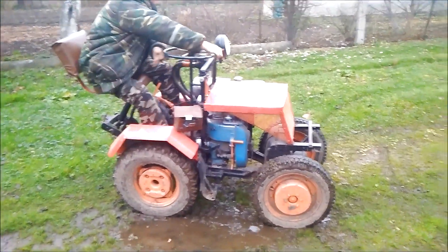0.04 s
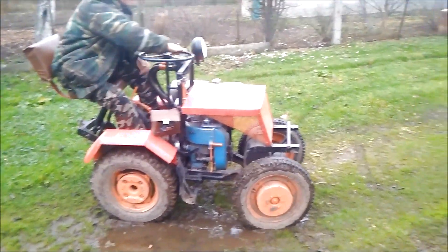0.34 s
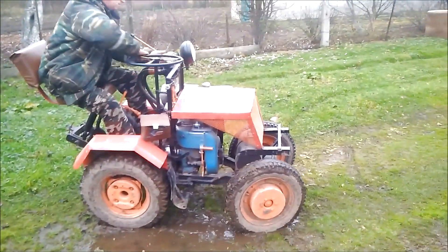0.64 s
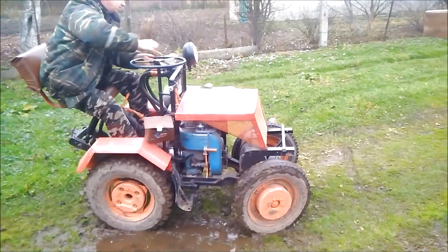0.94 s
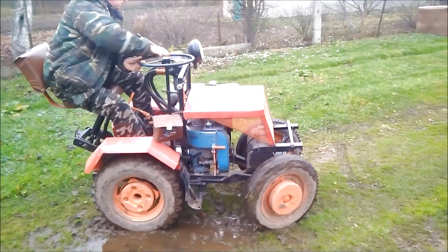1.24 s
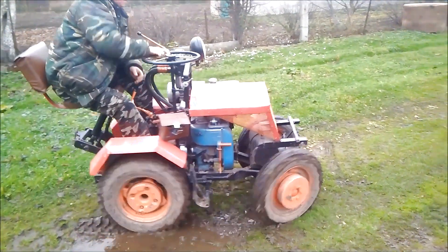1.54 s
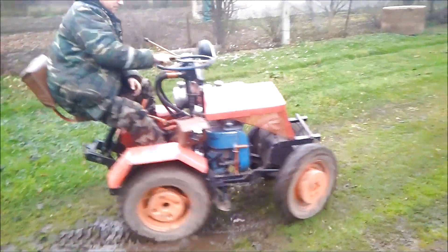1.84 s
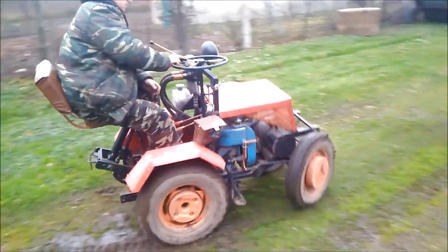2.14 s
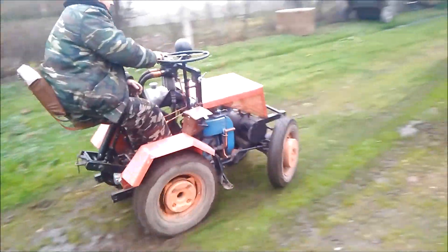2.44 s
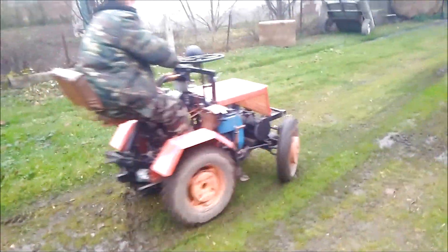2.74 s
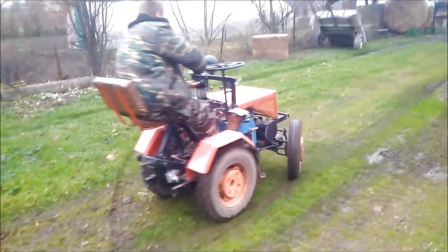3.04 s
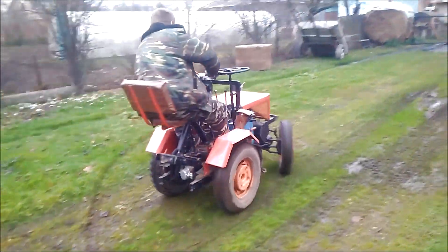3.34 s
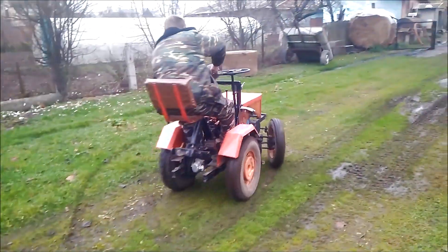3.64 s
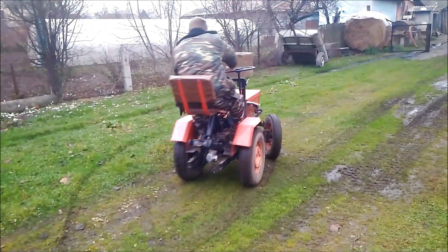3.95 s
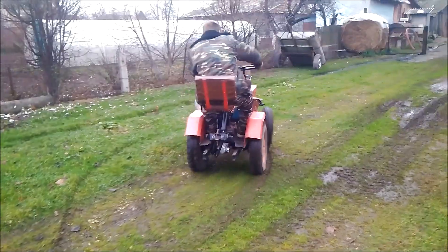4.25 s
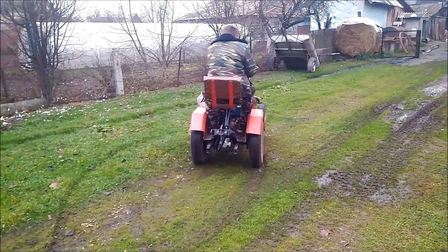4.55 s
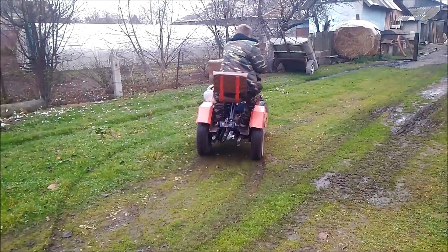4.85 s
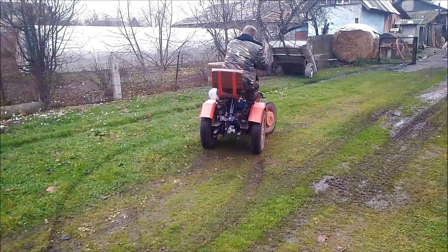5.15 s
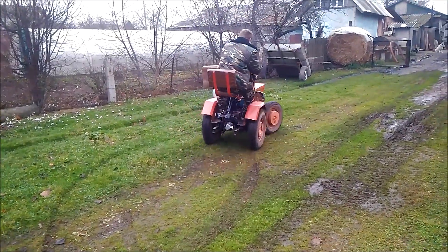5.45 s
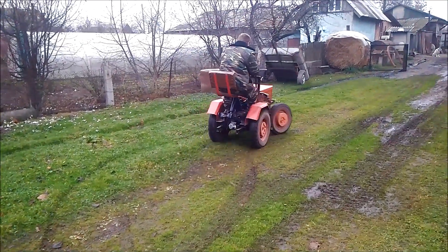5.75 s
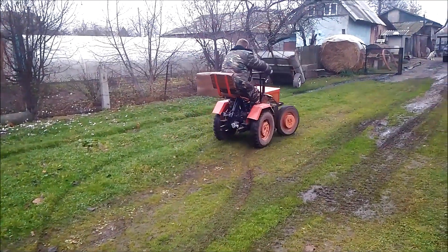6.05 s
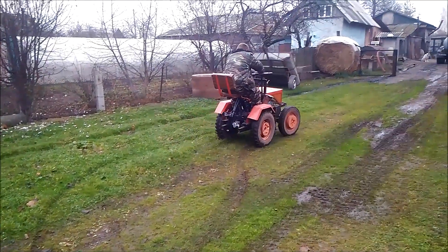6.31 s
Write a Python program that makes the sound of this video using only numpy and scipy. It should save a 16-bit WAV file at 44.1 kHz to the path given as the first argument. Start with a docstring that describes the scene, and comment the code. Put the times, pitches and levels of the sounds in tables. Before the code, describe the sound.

Rapid chugging and metallic clatter from a mini tractor, which revs, dips, knocks and pulls a short way off, sounding duller.

```python
"""A grassy yard with a fence and sheds, the microphone two to three metres from a homemade mini tractor.
Its single-cylinder four-stroke fires about 21 times a second: each firing thumps in the muffler, barks
from the pipe and shakes the casing and loose sheet metal, while tappets tick and the fan whines.
The engine revs, sags and knocks as it takes the load, picks up, and pulls away to six or seven metres,
tail towards the microphone. Behind it lie a faint echo, quiet air and a little wind on the microphone."""
import sys
import numpy as np
from scipy import signal
from scipy.fft import rfft, irfft, next_fast_len
from scipy.io import wavfile
from scipy.ndimage import uniform_filter1d, map_coordinates

SR = 44100
rng = np.random.default_rng(int(sys.argv[2]) if len(sys.argv) > 2 else 0)


def unload_wav(signal):
    """Save mono or channel-first audio to the path in sys.argv[1] as 16-bit WAV at rate SR, clipped to [-1, 1]."""
    wavfile.write(
        sys.argv[1],
        SR,
        np.round(np.clip(np.atleast_2d(signal).T, -1, 1) * 32767).astype(np.int16),
    )


N = 290178

# engine speed: time_s, firings_per_s
ENGINE_SPEED = [(0.0, 21.17), (0.36, 22.62), (0.62, 24.25), (0.91, 25.06), (1.3, 23.48), (1.64, 22.89),
                (1.93, 18.51), (2.07, 18.53), (2.37, 20.99), (2.99, 22.49), (3.42, 21.64), (4.06, 21.25),
                (4.45, 21.61), (5.1, 20.63), (5.44, 21.12), (6.17, 19.11), (6.58, 18.69)]
# how hard the cylinder fires: time_s, effort_db
ENGINE_EFFORT = [(.03, 14.5), (.12, 9.5), (.33, 0.5), (.46, 5), (.53, 3.5), (.64, 4), (1, 6.5),
                 (1.18, -1.24), (2.08, -2.5), (2.25, -0.5), (2.37, -2), (2.48, -3), (3.75, 2.5), (5.6, 2),
                 (5.96, 1), (6.12, -3.5), (6.58, -1)]
# path from the microphone: time_s, distance_m, heading (0 side, 1 rear quarter, 2 tail, 3+ far quarter)
DRIVE_PATH = [(0, 3, 0.28), (2.3, 2.03, 0.03), (2.9, 2.3, 0.34), (3.5, 3.94, 0.79), (3.8, 4.07, 0.75),
              (4.3, 4.2, 2), (5.55, 5.14, 2.17), (6.1, 6.8, 3.65), (6.58, 6, 4.1)]
# where the tractor sits in the stereo picture: time_s, left_minus_right_db
BALANCE = [(0, 4), (.3, 2), (.75, 3.4), (1.25, 4), (1.75, 7.5), (2.25, 1), (2.75, 4.5), (3.25, 3.5),
           (3.8, 5), (6.58, 5)]
# the thump thins in the free rev and swells under load: time_s, gain_db
THUMP_GAIN = [(.1, 0.5), (.33, 2.3), (.7, 1), (.9, -4.5), (1.05, -3), (1.2, 0), (1.6, 0), (1.95, -0.7),
              (2.15, -1), (2.25, 3.5), (2.36, 4), (2.46, -0.3), (3.4, -1), (5.6, -1.9), (6.1, 3), (6.55, 1)]
# bark and gas rush at the pipe: time_s, gain_db
BARK_GAIN = [(0, -5.5), (.13, -4), (.22, 0), (.35, 2.5), (.65, 5), (1.02, -1.5), (1.22, -4.5), (1.75, -13),
             (2.35, -12.5), (2.7, -9), (3.27, -3.5), (4.3, -5.5), (5.97, -2.5), (6.12, -2.5), (6.58, -9.5)]
# firings that burn harder than their neighbours: time_s, extra_bark_db
HARD_FIRINGS = [(3.26, 3.5), (3.54, 0), (3.59, 4.5), (3.72, 6), (4.1, 2), (4.47, 2.5), (5.23, 4), (5.47, 4),
                (6.48, 4)]
# pipe resonances as heard from each heading: pitch_hz, width_hz, signed_strength
SIDE_MODES = [(159, 21, 0.19), (290, 67, -0.041), (431, 167, 0.77), (453.5, 58, -1.01), (600, 123, -0.16)]
QUARTER_MODES = [(195, 74, -0.67), (364, 90, 0.27), (498, 36, 0.2), (605, 44, 0.42), (686, 25, -0.22),
                 (927, 37, 0.08), (1100, 100, 0.01), (1350, 110, -0.06), (1550, 60, 0.1)]
TAIL_MODES = [(203.3, 46, 0.78), (392.6, 57, -0.39), (595, 24, -0.19), (676, 15, 0.15), (926, 83, 0.047),
              (1120, 99, -0.041), (1360, 270, 0.077)]
FAR_MODES = [(190, 41, 1), (350, 140, -0.15), (589, 33, 0.28)]
# the wave returning from the muffler's far end: pitch_hz, width_hz, signed_strength
RETURN_MODES = [(220, 170, -0.2), (409, 51, 0.2)]
# gas turbulence in the pipe: frequency_hz, level_db
GAS_COLOUR = [(20, -4), (60, 10), (120, -14), (200, 6.5), (300, 13.5), (450, 1.5), (650, 0.5), (1000, 4),
              (2500, -115)]
# spectra of the shaken and struck parts: frequency_hz, left_db, right_db
CASING_COLOUR = [(210, -25.5, -5), (454, 5.5, 3.5), (740, 7, 2), (870, 0, -5), (1050, 0.5, -3.5),
                 (1505, 5, -1.5), (1987, -4, -6), (2385, -4, -1.5), (2940, -52, -53)]
FIN_COLOUR = [(1770, -43, -35), (2440, -6.5, -11), (2760, -4, -4.5), (2970, 0.5, -2), (3670, 1.5, -3),
              (3950, 0.5, -34), (4800, -5.5, -16), (5500, -32, -43)]
FRAME_COLOUR = [(695, -24, -30), (920, -6, -9), (1100, 0, -3), (1200, -2, -7), (1400, -10, -14),
                (1900, -27, -29)]
SHEET_COLOUR = [(4000, -39, -14.5), (5130, -34, 0), (5100, 1.5, -1), (5750, 2.5, -3), (6280, 6, -6),
                (6900, 2.5, -10), (7620, -4, -6), (8000, -4, -14), (9130, 3, -5), (10500, -13, -36),
                (11540, -5.5, -5), (12400, -26, -16.5), (14600, -21, -33), (15000, -32, -19)]
JINGLE_COLOUR = [(7400, -27, -32), (9400, -10.5, -10), (10080, -2.5, -10), (10270, -26, 3.5),
                 (10680, -3, 1.5), (10880, -19, 1), (11550, -12, -19), (13200, -28, -23), (16200, -41, -41)]
KNOCK_COLOUR = [(920, -7, -5), (1420, 11.5, 3), (2030, 5.5, 3.5), (2460, -1, 1.5), (3120, 8.5, 1),
                (4700, 4, -10), (5900, -27, -29), (8900, -1, -8), (15500, -11, -9)]
SLAP_COLOUR = [(1000, -30, -32), (1590, -6, -7), (2360, -12.5, -14), (3370, -1, -4), (4550, -9, -19),
               (5600, 4, -1), (6900, -3, -9), (8050, -5, -8), (9600, 7, 5.5), (11000, 2, -2),
               (12500, -12, -7), (13500, -9, -9), (15600, -20, -20)]
TAPPET_COLOUR = [(900, -25, -28), (1500, 0, 2), (2400, -18, -10), (3300, 3, -2), (4600, -14, -18),
                 (5800, 1, -5), (7900, 3, -1), (10500, 2, 4), (12600, -13, -9), (15500, -22, -21)]
# jolts that throw the loose parts about: time_s, jingle_db, sheet_db
LOOSE_JOLTS = [(0.022, -23.5, -34), (0.07, -31, -30), (.118, -25.5, -29), (.162, -27, -37),
               (.385, -32.5, -44), (0.431, -19.5, -37.5), (0.473, -22.5, -41), (0.557, -22, -46),
               (0.6, -26.5, -38), (0.641, -25.5, -31.5), (.682, -33, -32.5), (.723, -27, -47),
               (0.764, -22.5, -32), (0.805, -25, -30), (0.846, -32, -43), (0.886, -36, -30.5),
               (1.088, -47, -34), (1.129, -31, -31), (1.214, -51, -33.5), (1.257, -35, -34),
               (1.343, -33.5, -43), (1.385, -31, -50), (1.427, -39, -37), (1.555, -30, -52),
               (1.598, -35, -56), (1.642, -55, -32), (1.686, -52, -38.5), (1.732, -35, -30),
               (1.879, -33, -32), (1.93, -31.5, -37), (1.984, -35.5, -57), (2.038, -35, -33),
               (2.091, -28.5, -37), (2.197, -31.5, -29.5), (2.247, -30, -32.5), (2.297, -26, -28),
               (2.346, -29, -31), (2.392, -23.5, -41), (2.44, -27.5, -36), (2.487, -32, -32),
               (2.535, -40, -36), (2.581, -33, -42), (2.627, -30.5, -46), (2.72, -34, -33.5),
               (2.766, -41, -33), (2.812, -41, -35.5), (2.9, -39, -34.5), (2.99, -46, -41),
               (3.035, -31.5, -62), (3.26, -34, -36.5), (3.08, -38, -55), (3.125, -50, -39.5),
               (3.63, -48, -55), (3.722, -50, -42), (3.77, -59, -49), (3.909, -40.5, -44),
               (4.189, -63, -45.5), (4.33, -67, -48), (4.797, -41, -61), (4.94, -83, -47),
               (5.61, -64, -45.5), (5.708, -47, -48), (6.17, -47, -70), (6.22, -46, -70),
               (6.27, -44.5, -69), (6.43, -47, -49), (6.54, -45, -72)]
# bumps in the grass that make the frame knock: time_s, level_db
GRASS_BUMPS = [(2.62, -48.5), (3.06, -53), (3.52, -53), (4.05, -49.5), (4.36, -57), (5.73, -56),
               (5.97, -56.5)]
# firings that knock under load: time_s, level_db
KNOCK_FIRINGS = [(.022, -28.5), (.07, -35.5), (.118, -38), (.473, -42), (.6, -41), (.641, -38),
                 (.806, -41.5), (1.641, -45), (2.198, -36.5), (2.249, -40), (2.298, -34.5), (2.346, -38),
                 (2.535, -41), (6.48, -56.5)]
# taps of the valve gear: cycle_fraction, level_db
VALVE_TAPS = [(.21, 0), (0.571, -4.5), (0.652, -9), (.93, -11)]
# fan tone and its sidebands: firing_rate_multiple, level_db
FAN_LINES = [(29, -13), (30, -11), (32, 0)]
# the fan's whine at the microphone: time_s, level_db
FAN_LEVEL = [(0, -47), (.53, -47), (.64, -40), (.95, -39), (1.12, -43), (1.2, -51.5), (1.65, -50.5),
             (1.8, -61), (2.4, -58), (3.3, -58), (4.2, -64), (6.58, -71)]
# blows in the drive train: start_s, level_db
CLANK_BLOWS = [(.476, -28), (.809, -30), (.93, -31), (2.149, -25), (2.202, -31), (2.3, -31)]
# ring of the drive train: pitch_hz, level_db, t60_s
CLANK_MODES = [(1210, -7, .018), (1453, 0, .022), (1610, -5, .018), (3144, -16, .025)]
# tones of the groan: pitch_hz, width_hz, strength
GROAN_TONES = [(587, 28, 0.99), (689, 25, 1), (738, 26, 0.92)]
# decay of the yard's echo: frequency_hz, t60_s
YARD_DECAY = [(100, 0.089), (1000, 0.072), (10000, 0.73)]
# outdoor air, and wind on the microphone: frequency_hz, level_db
AIR_COLOUR = [(20, -16), (60, -3), (200, -2.5), (1000, -19), (2300, -19.5), (3500, -20.5), (9000, -22),
              (12500, -29), (15000, -50)]
WIND_COLOUR = [(15, 0), (30, -4), (45, -7), (150, -38)]

CRUISE_HZ = 21  # firing rate at cruising speed
TIME_S = np.arange(N) / SR
BURST_MS = np.arange(SR // 8) * 1000 / SR
PULSE_HZ = np.fft.rfftfreq(SR // 10, 1 / SR)  # frequency axis of one exhaust pulse


def exhaust(firings):
    """Each blowdown thumps in the muffler, barks from the pipe and drives a rush of turbulent gas."""
    at_firing = np.maximum(firings, 0)
    tracks = curves(ENGINE_SPEED) + curves(BARK_GAIN) + curves(DRIVE_PATH)
    rate_hz, bark_db, _, heading = (track[at_firing, None] for track in tracks)
    thump = amp(curves(THUMP_GAIN)[0]) * muffler_thump(firings, rate_hz, bark_db)
    bark = amp(-1.4) * pipe_bark(firings, rate_hz, heading)
    gusts = bursts(firings, 1.3, rise_ms=4, fall_ms=18, tail=(-26, 48), valve_db=-35, scatter_db=.5)
    gas = amp(-14) * noise(GAS_COLOUR, gusts, patchy_db=2.5, apart_hz=724)
    level = loudness(-34.5, per_effort=1, rev_db=-.27, hidden_db=-1)  # the pipe points backwards
    return level * (thump + amp(curves(BARK_GAIN)[0]) * (bark + gas))


def muffler_thump(firings, rate_hz, bark_db):
    """Blowdown rings the muffler; faster, hotter gas lifts its note."""
    heat = 1 + .0035 * (bark_db - bark_db.mean())
    ring_hz = 117 * heat * (rate_hz / CRUISE_HZ) ** .4
    width_hz = 27 * (rate_hz / CRUISE_HZ) ** 2  # more flow damps the ring
    ring = -resonance(PULSE_HZ, ring_hz, width_hz) * resonance(PULSE_HZ, 105, 88)
    return unit(train(firings, irfft(ring * delay(PULSE_HZ, 3.22)), scatter_db=.5))


def pipe_bark(firings, rate_hz, heading, brightness_hz=1250):
    """The pipe puffs at each firing, changing colour as it turns towards the microphone."""
    lift = (rate_hz / 24.08) ** .89  # faster, hotter gas lifts the side-on bark
    returned = amp(-9.5) * pipe_response(PULSE_HZ, RETURN_MODES, 13.38)
    views = [pipe_response(PULSE_HZ / lift, SIDE_MODES, .87, suck_ms=10.91, suck=.46) + returned,
             pipe_response(PULSE_HZ, QUARTER_MODES, 3.44, suck_ms=18, suck=.013),
             pipe_response(PULSE_HZ, TAIL_MODES, 1.41, suck_ms=9.84, suck=.072),
             pipe_response(PULSE_HZ, FAR_MODES, 1.51, suck_ms=8.75, suck=.25)]
    heading = np.clip(heading, 0, len(views) - 1)
    blend = sum(np.maximum(1 - abs(heading - k), 0) * view for k, view in enumerate(views))
    puffs = irfft(blend * np.exp(-(PULSE_HZ / brightness_hz) ** 2))
    puffs /= np.linalg.norm(puffs, axis=1, keepdims=True)
    extra_db = sum(db * (abs(firings[:, None] / SR - s) < .5 / rate_hz) for s, db in HARD_FIRINGS)
    return unit(train(firings, amp(extra_db) * puffs, scatter_db=1.1))


def pipe_response(f, modes, blow_ms, suck_ms=0, suck=0):
    """The blowdown pulse, then any weaker suction pulse, through the pipe's resonances."""
    body = sum(strength * resonance(f, hz, width) for hz, width, strength in modes)
    response = body * (delay(f, blow_ms) - suck * delay(f, suck_ms))
    return response / np.linalg.norm(response, axis=-1, keepdims=True)


def metal_rattle(firings):
    """Every firing sets off tiny contacts in the casing, cooling fins, frame, panels and loose steel."""
    grain = lambda depth_db: amp(depth_db * wobble(1400))
    casing = grain(2.5)
    casing *= bursts(firings, .4, rise_ms=4.1, fall_ms=10, tail=(-12, 42), valve_db=-37, scatter_db=2)
    fins = grain(1)
    fins *= bursts(firings, -.49, rise_ms=4.9, fall_ms=4.84, tail=(-14.5, 37.7),
                   valve_db=-24, scatter_db=3)
    frame = bursts(firings, 1.8, rise_ms=3, fall_ms=4.3, tail=(-20.5, 36), valve_db=-33, scatter_db=.5)
    sheet = grain(1)
    sheet *= bursts(firings, .4, rise_ms=2.8, fall_ms=4.8, tail=(-15.5, 26), valve_db=-17, scatter_db=1)
    jingle = bursts(firings, 1, rise_ms=2.4, fall_ms=4.4, tail=(-17, 24), valve_db=-21, scatter_db=.8)

    jingle_jolts, sheet_jolts = accents(LOOSE_JOLTS)
    bumps = sum(amp(db) * bell(s, width_s=.088) for s, db in GRASS_BUMPS)
    fitful = lambda depth_db: amp(depth_db * wobble(CRUISE_HZ))  # loose parts catch some firings harder
    casing_gain = loudness(-44.5, per_effort=1, rev_db=.82, hidden_db=9)
    fin_gain = loudness(-47.5, per_effort=1.27, rev_db=.3, hidden_db=11.5)
    frame_gain = loudness(-56.5, per_effort=.59, rev_db=1, hidden_db=5)
    sheet_gain = fitful(2) * loudness(-39.5, per_effort=1, rev_db=-.17, hidden_db=13.5)
    jingle_gain = fitful(3) * loudness(-45.5, per_effort=.6, rev_db=.3, hidden_db=17)
    return (casing_gain * noise(CASING_COLOUR, casing, patchy_db=2)
            + fin_gain * noise(FIN_COLOUR, fins, patchy_db=2.5)
            + np.hypot(frame_gain, bumps) * noise(FRAME_COLOUR, frame, patchy_db=4.5)
            + np.hypot(sheet_gain, amp(-3.5) * sheet_jolts) * noise(SHEET_COLOUR, sheet, 3.5)
            + np.hypot(jingle_gain, amp(-5.5) * jingle_jolts) * noise(JINGLE_COLOUR, jingle, 3.5))


def cylinder_knock(firings):
    """Under sudden load the cylinder knocks: a hard, dry crack on top of the firing."""
    crack = bursts(firings, .9, rise_ms=3.2, fall_ms=4.5, tail=(-34, 20), valve_db=-38, scatter_db=0)
    return accents(KNOCK_FIRINGS) * noise(KNOCK_COLOUR, crack, patchy_db=3)


def piston_slap(firings):
    """The piston slaps the bore at peak pressure: one short, hard contact, never twice the same."""
    contacts = firings + (.0005 * SR * rng.standard_normal(len(firings))).astype(int)
    slap = bursts(contacts, 2.5, rise_ms=1, fall_ms=2.2, tail=(-20, 18), valve_db=-20, scatter_db=2.5)
    level = loudness(-45.5, per_effort=.45, rev_db=-.3, hidden_db=11.5)
    return level * noise(SLAP_COLOUR, slap, patchy_db=4)


def tappets(firings, fall_ms=1.5, jitter_ms=1.2):
    """The rockers tick between firings; slack tappets never strike twice alike."""
    period = SR / curves(ENGINE_SPEED)[0][np.maximum(firings, 0)]
    taps = np.zeros(N)
    for fraction, db in VALVE_TAPS:
        slack = jitter_ms * SR / 1000 * rng.standard_normal(len(firings))
        strikes = (firings + fraction * period + slack).astype(int)
        taps += train(strikes, amp(db) * np.exp(-BURST_MS / fall_ms), scatter_db=3.5)
    level = loudness(-50, per_effort=.7, rev_db=.6, hidden_db=11)
    return level * noise(TAPPET_COLOUR, unit(taps), patchy_db=4)


def fan_whine(cycles):
    """Sixteen blades pass twice per firing: a clean whine, with sidebands from the uneven crank."""
    phase = 2 * np.pi * cycles
    lines = sum(amp(db + wobble(15)) * np.sin(k * phase + .22 * wobble(30)) for k, db in FAN_LINES)
    flutter = 1 + .25 * wobble(130)
    duck = 1 - .5 * np.sin(phase)  # dips on each exhaust stroke
    return amp(curves(FAN_LEVEL)[0]) * unit(lines * flutter * duck)


def drive_clanks():
    """The drive train rings as it takes up its slack, a little differently at each blow."""
    t, out = np.arange(SR // 5) / SR, np.zeros(N + SR)
    attack = 1 - np.exp(-t / .001)
    for start_s, db in CLANK_BLOWS:
        for hz, mode_db, t60_s in CLANK_MODES:
            scatter_db, detune, phase = rng.standard_normal(3) * [2, .004, np.pi]
            ring = np.exp(-np.log(1000) * t / t60_s) * np.sin(2 * np.pi * hz * (1 + detune) * t + phase)
            out[round(start_s * SR):][:len(t)] += amp(db + mode_db + scatter_db) * attack * ring
    return out[:N]


def groan():
    """Three rough tones swell and fade as the tractor moves off."""
    peaks = lambda f: sum(strength * resonance(f, hz, width) ** 2 for hz, width, strength in GROAN_TONES)
    tones = unit(filtered(rng.standard_normal(N), peaks))
    return amp(-44.5) * tones * bell(2.446, width_s=.092)


def yard_echo(x):
    """Fence and sheds return a faint scatter, different in each channel."""
    hz, t, spectrum = signal.stft(rng.standard_normal((2, SR // 3)), SR, nperseg=256)
    t60_s = np.interp(hz, *np.transpose(YARD_DECAY))[:, None]
    tail = signal.istft(spectrum * np.exp(-np.log(1000) * t / t60_s), SR, nperseg=256)[1]
    return amp(-21) * signal.fftconvolve(x, tail / np.linalg.norm(tail[0]), axes=1)[:, :N]


def outdoor_air():
    """Quiet air all round the microphone, wide and gently wavering."""
    return amp(-55.5) * noise(AIR_COLOUR, amp(.69 * wobble(2.73)), patchy_db=-3, apart_hz=100)


def microphone_wind(fade_db_per_s=5.5):
    """Wind rumbles on the microphone ports and dies away."""
    rumble = noise(WIND_COLOUR, amp(1.8 * wobble(3.3)), patchy_db=1, apart_hz=10)
    return amp(-51 - fade_db_per_s * TIME_S) * rumble


def loudness(base_db, per_effort, rev_db, hidden_db):
    """A part's gain at the microphone; rev_db is per Hz over cruise, hidden_db is lost on turning away."""
    distance_m, heading = curves(DRIVE_PATH)
    drive_db = per_effort * curves(ENGINE_EFFORT)[0] + rev_db * (curves(ENGINE_SPEED)[0] - CRUISE_HZ)
    return amp(base_db + drive_db - hidden_db * np.minimum(heading, 1)) * 2.5 / distance_m


def bursts(firings, start_ms, rise_ms, fall_ms, tail, valve_db, scatter_db):
    """Envelope of rms 1: a blow per firing, its tail (level_db, fall_ms), a valve tap 25 ms after firing."""
    def blow(at_ms, decay_ms):
        age_ms = np.maximum(BURST_MS - at_ms, 0)
        return (1 - np.exp(-(age_ms / rise_ms) ** 2)) * np.exp(-age_ms / decay_ms)
    tail_db, tail_ms = tail
    main = train(firings, blow(start_ms, fall_ms), scatter_db)
    ring_out = train(firings, amp(tail_db) * blow(start_ms, tail_ms), scatter_db / 2)
    valve = train(firings, amp(valve_db) * blow(25, fall_ms), scatter_db)
    return unit(np.sqrt(main ** 2 + ring_out ** 2 + valve ** 2))


def train(firings, shapes, scatter_db):
    """Lay one shape at each firing; no two are equally strong."""
    sized = shapes * amp(scatter_db * rng.standard_normal((len(firings), 1)))
    places = firings[:, None] + np.arange(sized.shape[1])
    return np.bincount(places[places >= 0], sized[places >= 0])[:N]


def accents(rows):
    """Gains that hold for about one firing at each listed time, one per level column."""
    gain = np.zeros((len(rows[0]) - 1, N))
    for s, *levels_db in rows:
        gain[:, max(int((s - .008) * SR), 0):int((s + .036) * SR)] = amp(levels_db)[:, None]
    return gain


def noise(points, swell, patchy_db, apart_hz=3600):
    """Swelling stereo noise with shifting resonant patches; the channels part above apart_hz."""
    spectrum = signal.stft(rng.standard_normal((2, N)), nperseg=512)[2]
    patches = uniform_filter1d(rng.standard_normal(spectrum.shape[1:]), size=6, axis=0)
    patches = uniform_filter1d(patches, size=14, axis=1)
    pair = signal.istft(spectrum * amp(patchy_db * patches / patches.std()), nperseg=512)[1][:, :N]
    spread = lambda hz: np.arccos(1 / (1 + (hz / apart_hz) ** 2)) / 2
    mid, side = filtered(pair * swell, lambda hz: np.array([np.cos(spread(hz)), np.sin(spread(hz))]))
    return unit(filtered(np.array([mid + side, mid - side]), lambda hz: colour(points, hz)))


def colour(points, hz):
    """Gains along a log frequency axis, one row per level column."""
    f, *columns = np.transpose(points)
    return amp([np.interp(np.log(hz + 1), np.log(f), column) for column in columns])


def curves(rows):
    """One value per sample for each column after the time."""
    s, *columns = np.transpose(rows)
    return [np.interp(TIME_S, s, column) for column in columns]


def bell(centre_s, width_s):
    """A smooth swell and fade."""
    return np.exp(-((TIME_S - centre_s) / width_s) ** 2)


def wobble(rate):
    """A smooth random curve, rate knots a second."""
    return map_coordinates(rng.standard_normal(int(N * rate / SR) + 4), [TIME_S * rate])


def filtered(x, response):
    """Pass x through a frequency response."""
    size = next_fast_len(N + SR // 2)
    return irfft(rfft(x, size) * response(np.fft.rfftfreq(size, 1 / SR)), size)[..., :N]


def resonance(f, centre_hz, width_hz):
    """A causal band-pass resonance."""
    return 1j * f * width_hz / (centre_hz ** 2 - f * f + 1j * f * width_hz)


def delay(f, ms):
    """The phase ramp of a delay."""
    return np.exp(-2j * np.pi * f * ms / 1000)


def amp(db):
    """Decibels to gain."""
    return 10 ** (np.asarray(db) / 20)


def unit(x):
    """Scale to rms 1; a stereo pair is scaled by its middle."""
    return x / np.sqrt(np.mean(np.atleast_2d(x).mean(axis=0) ** 2) + 1e-20)


def scene():
    """The tractor up front, timed by its crank; air, echo and wind behind it."""
    cycles = .517 + np.cumsum(curves(ENGINE_SPEED)[0]) / SR
    firings = np.flatnonzero(np.diff(np.floor(cycles)))
    firings = np.append(2 * firings[0] - firings[1], firings)  # the engine is already running
    pan_db = curves(BALANCE)[0]
    sides = amp(np.array([pan_db, -pan_db]) / 2)
    tractor = (exhaust(firings) + fan_whine(cycles) + drive_clanks() + groan()) * sides / sides.mean(0)
    tractor += metal_rattle(firings) + cylinder_knock(firings) + piston_slap(firings) + tappets(firings)
    return tractor + outdoor_air() + yard_echo(tractor) + microphone_wind()


def record(dry):
    """The microphone port cuts two hollow notches; nothing is kept above 15.9 kHz."""
    port = lambda f: (1 - .87 * resonance(f, 2310, 520)) * (1 - .84 * resonance(f, 4680, 480))
    return filtered(dry, lambda f: port(f) * (f < 15900))


dry = scene()
out = record(dry)
unload_wav(out)
```